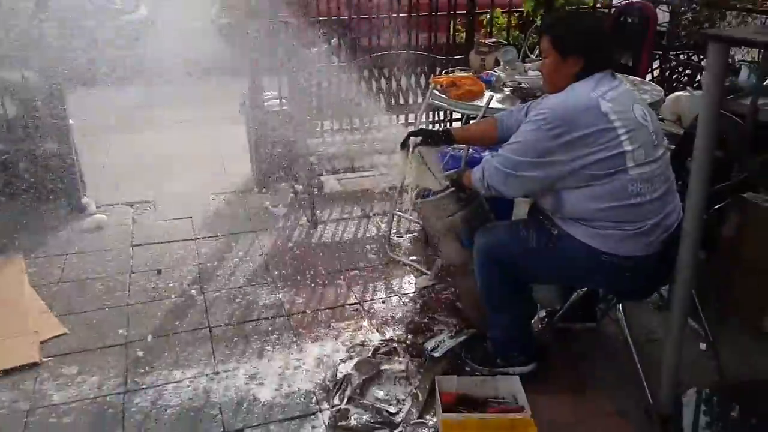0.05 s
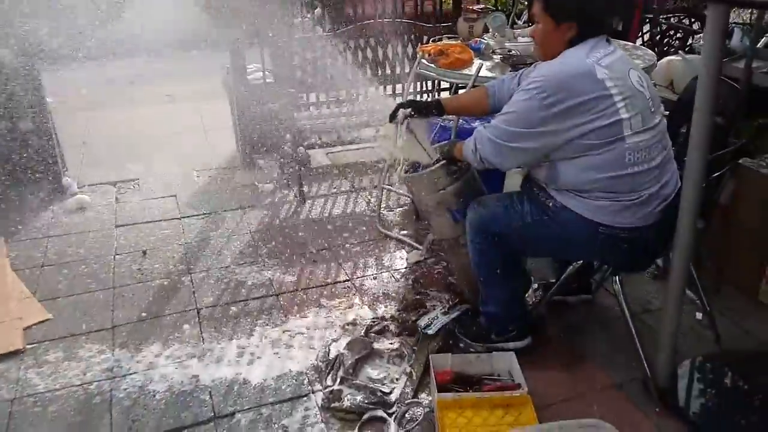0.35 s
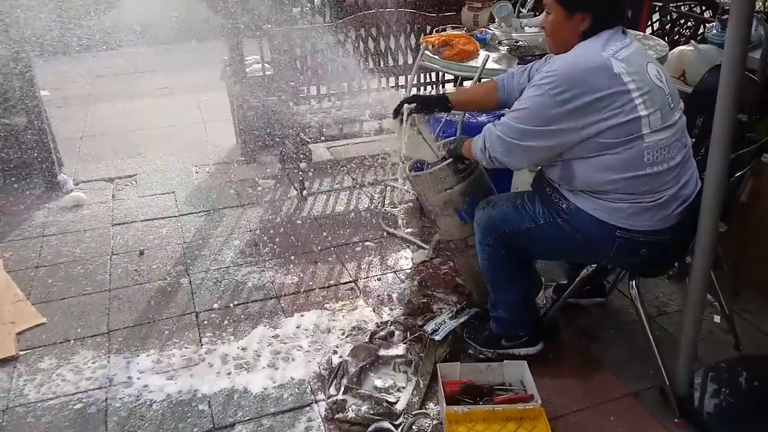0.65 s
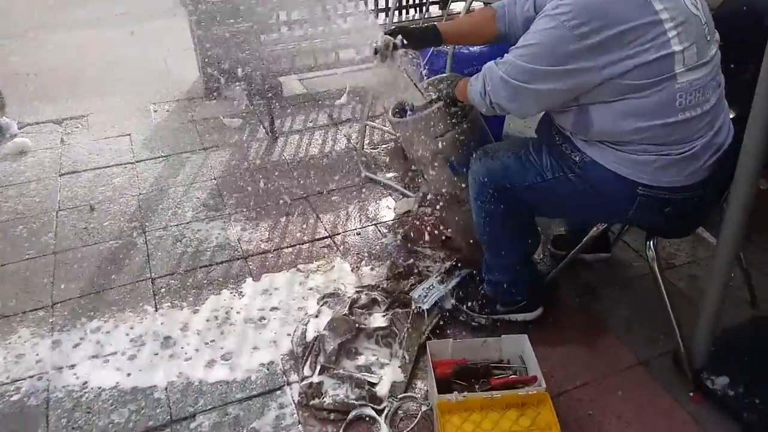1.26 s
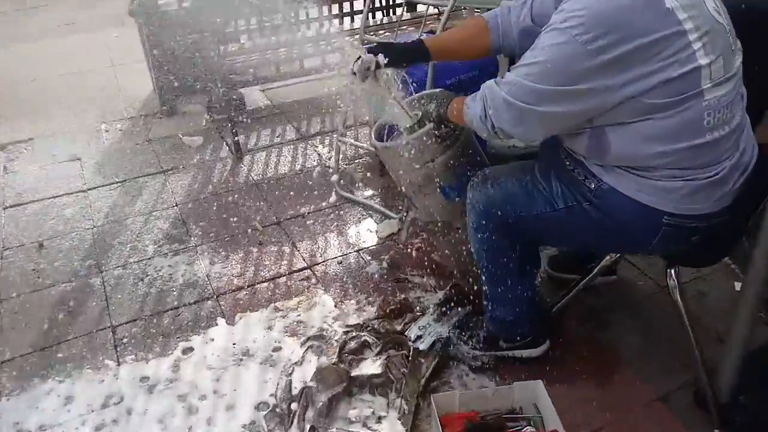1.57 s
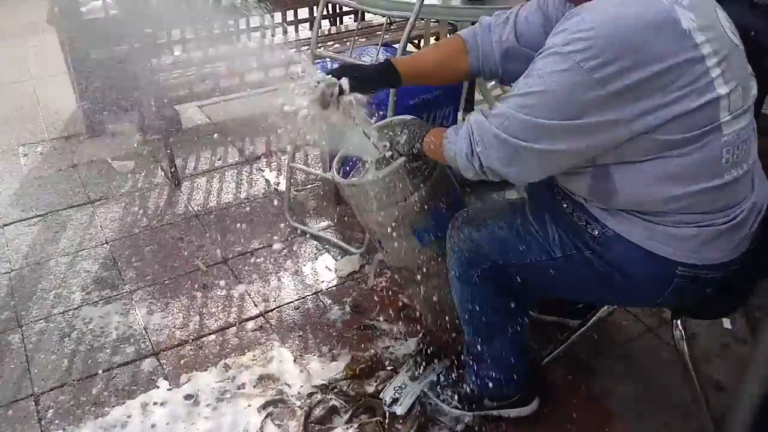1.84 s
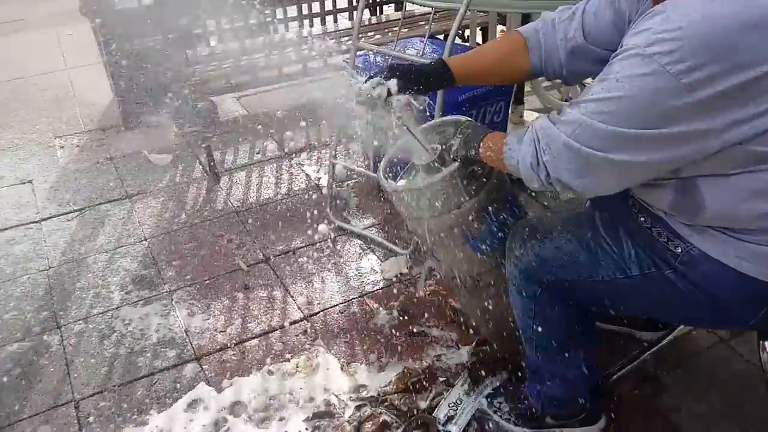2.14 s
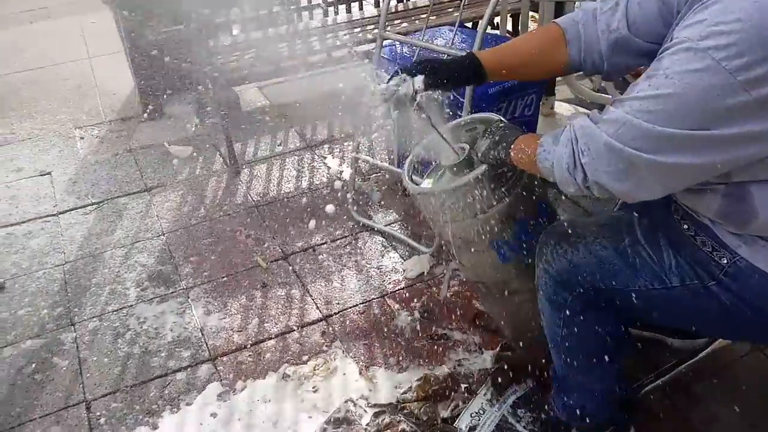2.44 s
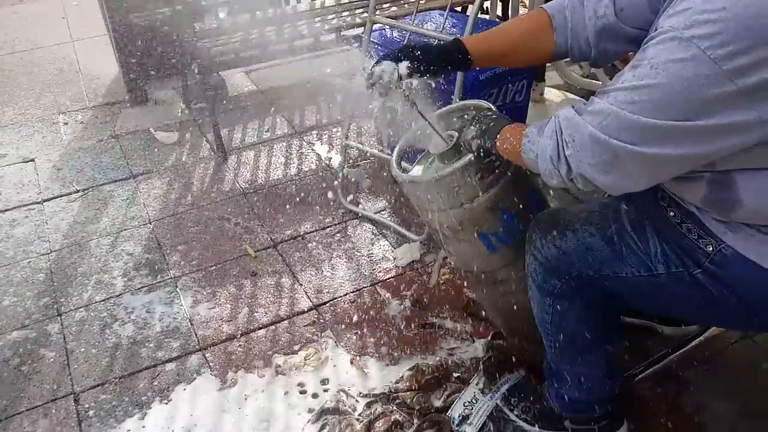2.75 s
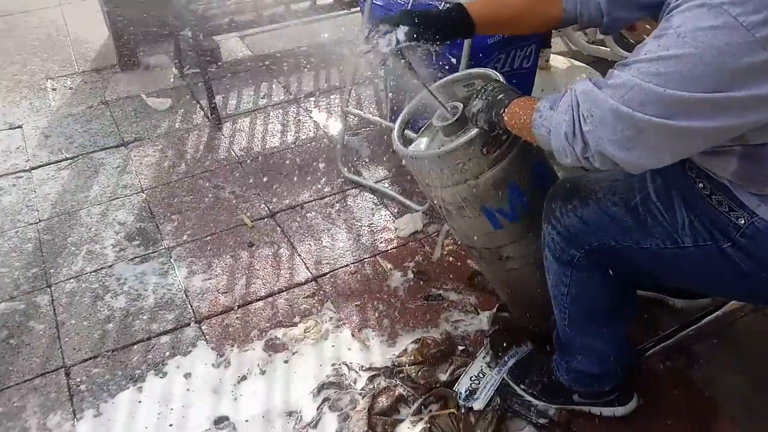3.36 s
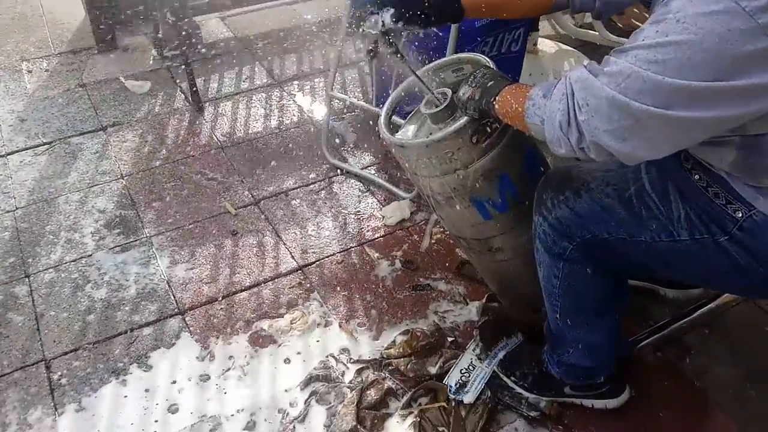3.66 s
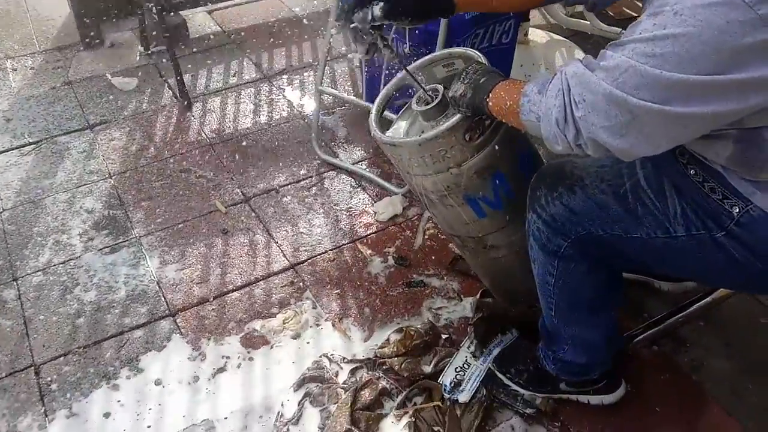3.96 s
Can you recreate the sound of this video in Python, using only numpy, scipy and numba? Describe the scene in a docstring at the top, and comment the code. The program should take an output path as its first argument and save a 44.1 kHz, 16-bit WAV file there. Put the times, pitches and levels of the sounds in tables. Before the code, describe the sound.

Beer sprays from a metal keg in spurts, then roars over hissing gas.

```python
"""Beer sprays from the loosened valve of a metal keg on an open patio, over a hiss of leaking gas.
It reaches the gap in spurts, then tears into one rough, ringing roar as the microphone moves closer.
Foam comes in surges, each with a sizzle, fine mist and a hollow note; the flow eases at the end.
A tool knocks twice on the valve, and a faint outdoor rumble lies underneath."""
import sys
import numpy as np
from scipy import signal
from scipy.fft import rfft, irfft
from scipy.io import wavfile
from scipy.ndimage import map_coordinates
from numba import njit

SR = 44100
rng = np.random.default_rng(int(sys.argv[2]) if len(sys.argv) > 2 else 0)


def persist_wave(psi):
    """Save psi, clipped to +-1, as 16-bit WAV."""
    counts = np.round(np.clip(psi, -1, 1) * 32767).astype(np.int16)
    wavfile.write(sys.argv[1], SR, np.atleast_2d(counts).T)


N = 176400
T = np.arange(N) / SR
BIN_HZ = np.arange(N // 2 + 1) * SR / N


def undb(db):
    """Decibels to gain."""
    return 10 ** (np.asarray(db) / 20)


def unit(x):
    """Scale to rms 1."""
    return x / np.sqrt(np.mean(x ** 2))


def envelope(rows):
    """Gain along (s, dB) points."""
    return undb(np.interp(T, *np.array(rows).T))


def noise():
    """White noise."""
    return rng.standard_normal(N)


def wander(hz):
    """Noise low-passed at hz, rms 1."""
    return unit(irfft(rfft(noise()) / (1 + (BIN_HZ / hz) ** 4), N))


def colour(x, spectrum):
    """Minimum-phase filter through (Hz, dB) points; keeps the power of white noise."""
    hz, db = np.array(spectrum).T
    gain = unit(undb(np.interp(np.log(BIN_HZ + 1), np.log(hz), db)))
    cepstrum = irfft(np.log(gain), N)
    cepstrum[1:N // 2] *= 2
    cepstrum[N // 2 + 1:] = 0
    return irfft(rfft(x) * np.exp(rfft(cepstrum)), N)


@njit
def moving_bandpass(x, hz, width_hz):
    """State-variable band-pass, gain 1 at its moving centre."""
    y, band, low = np.empty(len(x)), 0., 0.
    for i in range(len(x)):
        g, damping = np.tan(np.pi * hz[i] / SR), width_hz / hz[i]
        v = (band + g * (x[i] - low)) / (1 + g * (g + damping))
        band, low = 2 * v - band, low + 2 * g * v
        y[i] = damping * v
    return y


# Gas hiss. Each row: frequency in Hz, relative level in dB.
GAS_SPECTRUM = [(120, -48.5), (300, -22), (480, -15.5), (800, -7.5), (1100, -8.5), (1400, -0.5),
                (1750, -2.5), (2000, 2), (2600, -5), (3050, -1.5), (3600, -4), (4300, -3.5), (5000, -8),
                (6400, -9), (8000, -21), (9300, -28.5), (11000, -29.5), (11800, -37.5), (13900, -31),
                (14600, -22.5), (15700, -23)]
# Weakening of the leak. Each row: time in seconds, gain in dB.
GAS_FADE = [(3.2, 0.5), (3.8, -6), (4.0, -9)]
GAS_DB, GAS_FLUTTER_DB = -30, 0.9


def gas_leak():
    """Gas hisses through the valve, fluttering slightly."""
    hiss = colour(noise(), GAS_SPECTRUM)
    return hiss * undb(GAS_DB + GAS_FLUTTER_DB * wander(hz=41)) * envelope(GAS_FADE)


# Outdoor rumble. Each row: frequency in Hz, relative level in dB.
RUMBLE_SPECTRUM = [(20, -10), (38, -18), (55, -5), (150, 3), (240, -4), (400, -2.5)]
RUMBLE_DB = -63


def outdoor_rumble():
    """Steady low noise, rolled off toward 1500 Hz."""
    return colour(noise(), RUMBLE_SPECTRUM + [(1500, -60)]) * undb(RUMBLE_DB)


# Tool knocks. Each row: start in seconds, level in dB.
KNOCKS = [(0.357, -21.5), (3.97, -22)]
# Knock timbre. Each row: frequency in Hz, relative level in dB.
KNOCK_SPECTRUM = [(400, -18), (900, 8), (1900, 13), (3000, -3), (8000, -26)]
KNOCK_DECAY_S = 0.0035


def tool_knocks():
    """The tool strikes the valve: short, decaying bursts of noise."""
    strikes = sum(undb(db) * (T >= start) * np.exp(-np.abs(T - start) / KNOCK_DECAY_S)
                  for start, db in KNOCKS)
    return colour(noise() * strikes, KNOCK_SPECTRUM)


def spatter(per_s, spread_db, smooth_share):
    """Tiny bursts of uneven size over smooth turbulence."""
    impulses = (rng.random(N) < per_s / SR) * np.sign(noise())
    sizes = undb(spread_db * np.minimum(rng.exponential(size=N), 4))
    return np.sqrt(1 - smooth_share) * unit(impulses * sizes) + np.sqrt(smooth_share) * noise()


# Keg and valve resonances. Each row: centre in Hz, width in Hz, gain in dB.
RESONANCES = [(492, 99, 4), (730, 63, 1), (1570, 41, 3), (1775, 35, 6), (1950, 60, -2.5), (2048, 63, 7),
              (2540, 77, 3.5), (2940, 150, 1.5)]


def keg_ring(x):
    """Keg and valve resonate, shaping narrow bands of the spray."""
    f = BIN_HZ + SR / N  # one bin up avoids 0 Hz
    responses = [1 + (undb(db) - 1) / (1 + 1j * (f * f - hz * hz) / (f * width_hz))
                 for hz, width_hz, db in RESONANCES]
    return irfft(rfft(x) * np.prod(responses, axis=0), N)


# Reflection notch. Each row: time in seconds, centre in Hz, gain in dB.
NOTCH_PATH = [(1.1, 2245, -3), (1.4, 2400, 0.5), (2.4, 2291, -4.5)]
NOTCH_WIDTH_HZ = 89.0


def reflection_notch(x):
    """A reflection partly cancels one narrow band, which shifts as the microphone moves."""
    times, hz, db = np.array(NOTCH_PATH).T
    band = moving_bandpass(x, np.interp(T, times, hz), NOTCH_WIDTH_HZ)
    return x + (undb(np.interp(T, times, db)) - 1) * band


# Beer spurts. Each row: start in seconds, length in seconds, level in dB, extra gurgle in dB.
SPURTS = [(.723, .024, -15.5, 0), (.772, .013, -16.5, 2), (.791, .019, -17.3, 1.5), (.847, .031, -18, -3),
          (.893, .032, -18.3, -1), (.974, .029, -17.8, 0), (1.024, .028, -17, 1), (1.077, .03, -16.8, 0),
          (1.154, .041, -17, 2), (1.205, .047, -16.7, 2), (1.26, .026, -17, 2), (1.317, .05, -16.8, 0),
          (1.39, .04, -15, 1), (1.468, .08, -16, 0.5)]
# Flow through the gap. Each row: time in seconds, level in dB.
BEER_FLOW = [(.715, -60), (.76, -31), (.83, -25), (.95, -22), (1.06, -27), (1.305, -23), (1.335, -18.5),
             (1.7, -16.5), (2.15, -15.1), (2.84, -15.7), (2.875, -18), (2.92, -15.5), (3.3, -17.2),
             (3.86, -18.4), (3.92, -22.5)]
# Spray at first, then in full flow close by. Each row: frequency in Hz, relative level in dB.
FIRST_SPRAY_SPECTRUM = [(200, -54), (300, -29), (680, -14.5), (830, -11), (980, -25.5), (1200, -18),
                        (1550, -1.5), (2050, 0.5), (2650, 1), (3200, -8.5), (4400, -9.5), (9000, -54.5)]
FULL_SPRAY_SPECTRUM = [(200, -46), (300, -25), (480, -19), (780, -15), (1000, -20), (1200, -13), (1550, -4),
                       (2050, 1), (2650, -2.5), (3050, -2), (3450, -11), (4400, -20.5), (9000, -52.5)]
# A faster jet hisses higher. Each row: time in seconds, frequency factor.
JET_SPEED = [(.7, 0.98), (1.2, 1.017), (1.7, 1.027), (2.2, 1.049), (2.7, 1.02), (3.3, 0.98), (4.0, 0.91)]
CROSSFADE_MIDDLE_S, CROSSFADE_LENGTH_S = 1.92, 1
SPRAY_FLUTTER_DB, GURGLE_DB, GURGLE_TOP_HZ = 0.32, 1.57, 1210


def beer_spray():
    """Slugs of beer tear apart in the gap, in spurts and then without pause; the low end gurgles."""
    attack_s, release_s = .001, .004
    flow = envelope(BEER_FLOW)
    gurgle_db = GURGLE_DB * wander(hz=27.8)
    for start, length, db, extra_db in SPURTS:
        gate = np.clip((T - start) / attack_s, 0, 1)
        gate *= np.exp(-np.maximum(T - start - length, 0) / release_s)
        flow = np.maximum(flow, undb(db) * gate)
        gurgle_db += extra_db * gate
    tearing = spatter(per_s=2500, spread_db=3.0, smooth_share=0.56)
    tearing *= undb(SPRAY_FLUTTER_DB * wander(hz=70))
    read_position = np.cumsum(np.interp(T, *np.array(JET_SPEED).T))
    first, full = (map_coordinates(colour(tearing, spectrum), [read_position], mode="mirror")
                   for spectrum in (FIRST_SPRAY_SPECTRUM, FULL_SPRAY_SPECTRUM))
    blend = np.clip((T - CROSSFADE_MIDDLE_S) / CROSSFADE_LENGTH_S + .5, 0, 1)
    spray = reflection_notch(keg_ring((1 - blend) * first + blend * full))
    low = signal.sosfiltfilt(signal.butter(4, GURGLE_TOP_HZ, fs=SR, output="sos"), spray)
    return unit(spray + low * (undb(gurgle_db) - 1)) * flow


# Foam sizzle, fizz and mist. Each row: frequency in Hz, relative level in dB.
SIZZLE_SPECTRUM = [(3000, -28.5), (4000, 6), (5000, -0.5), (5700, 6.5), (6450, 0.5), (7000, -7.5),
                   (8000, -14.5), (9200, -39), (10000, -36), (14000, -56)]
FIZZ_SPECTRUM = [(6500, -19), (8000, 3), (9200, 0.5), (10000, -14.5), (14000, -21)]
MIST_SPECTRUM = [(9000, -37), (12800, -8), (13700, -11), (14600, 7), (15700, 3)]
# Foam layers at the top of a 0 dB surge. Each row: time in seconds, level in dB.
SIZZLE_LEVEL = [(.7, -49), (.75, -29), (1.15, -28.5), (1.5, -26), (2.8, -25), (3.6, -28), (4.0, -31.5)]
FIZZ_LEVEL = [(.7, -54), (1.4, -51), (2.25, -42), (3.45, -43.5), (4.0, -48.5)]
MIST_LEVEL = [(.7, -70), (1.4, -52), (2.15, -37), (3.0, -38), (3.5, -34.5), (4.0, -37)]
HOLLOW_LEVEL = [(1.5, -59), (1.9, -45), (2.35, -33), (4.0, -31.5)]
# Foam surges, about seven a second. Each row: middle in seconds, length in seconds, gain in dB.
SURGES = [(1.262, .1, -.5), (1.42, .06, 0), (1.53, .11, 0), (1.675, .11, -.5), (1.79, .075, 0),
          (1.925, .1, -1.5), (2.07, .1, 0), (2.218, .09, .5), (2.378, .1, 0), (2.545, .125, -.3),
          (2.69, .12, -1.3), (2.838, .09, -.8), (3.01, .16, -2.3), (3.16, .1, -1), (3.278, .055, -1),
          (3.415, .095, 0), (3.497, .04, -.5), (3.62, .105, -.7), (3.755, .09, -2.5)]
SURGE_FLOOR_DB, FOAM_FLUTTER_DB = -3.8, .5
HOLLOW_HZ, HOLLOW_WIDTH_HZ = 986, 81
MIST_EXPONENT, HOLLOW_EXPONENT = 1.8, 2.54


def foam():
    """Surging foam sizzles, fizzes as it bursts, throws mist and sounds a hollow note in the keg."""
    swells = sum(undb(db) * np.exp(-(2 * (T - middle) / length) ** 4) for middle, length, db in SURGES)
    surge = np.maximum(swells, undb(SURGE_FLOOR_DB))
    flutter = undb(FOAM_FLUTTER_DB * wander(hz=22))
    sizzle = colour(spatter(per_s=4000, spread_db=-2.0, smooth_share=0.89), SIZZLE_SPECTRUM)
    sizzle *= envelope(SIZZLE_LEVEL)
    fizz = colour(spatter(per_s=2200, spread_db=4.5, smooth_share=0.75), FIZZ_SPECTRUM)
    fizz *= envelope(FIZZ_LEVEL)
    mist = colour(noise(), MIST_SPECTRUM) * envelope(MIST_LEVEL)
    hiss = sizzle * surge + (fizz + mist) * surge ** MIST_EXPONENT
    edges_hz = [HOLLOW_HZ - HOLLOW_WIDTH_HZ / 2, HOLLOW_HZ + HOLLOW_WIDTH_HZ / 2]
    cavity = signal.butter(2, edges_hz, "band", fs=SR, output="sos")
    hollow = unit(signal.sosfilt(cavity, noise())) * envelope(HOLLOW_LEVEL)
    return hiss * flutter + hollow * surge ** HOLLOW_EXPONENT


PATIO_DB, PATIO_DELAY_S, PATIO_DECAY_S = -11.5, .004, 0.025


def patio_reflections(x):
    """Short reflections from paving and furniture."""
    tail = noise() * np.exp(-T / PATIO_DECAY_S) * (T > PATIO_DELAY_S)
    tail /= np.sqrt(np.sum(tail ** 2))
    return undb(PATIO_DB) * signal.fftconvolve(x, tail)[:N]


def scene():
    """Mono mix of the keg, its reflections and the rumble."""
    keg = gas_leak() + beer_spray() + foam() + tool_knocks()
    return (keg + patio_reflections(keg) + outdoor_rumble())[None]


CLIP_DRIVE, LOWPASS_HZ = 1.27, 15750


def record(dry):
    """Soft clip, then a steep low-pass."""
    rounded = np.tanh(CLIP_DRIVE * dry) / CLIP_DRIVE
    return signal.sosfilt(signal.ellip(10, .2, 80, LOWPASS_HZ, fs=SR, output="sos"), rounded)


dry = scene()
out = record(dry)
persist_wave(out)
```